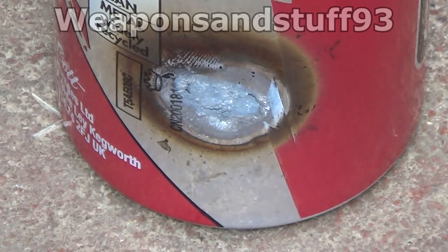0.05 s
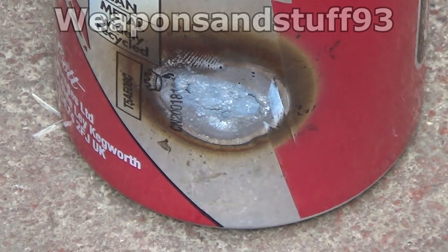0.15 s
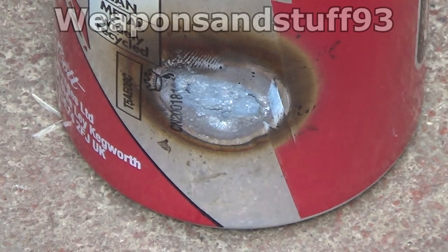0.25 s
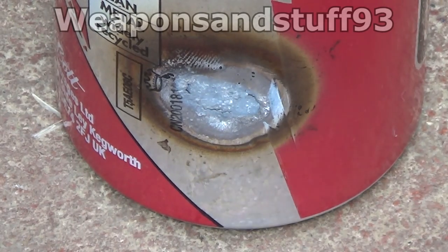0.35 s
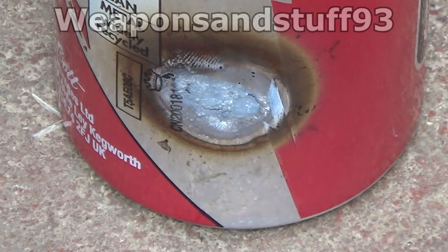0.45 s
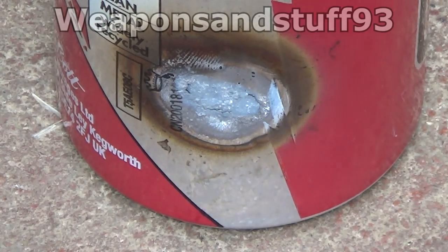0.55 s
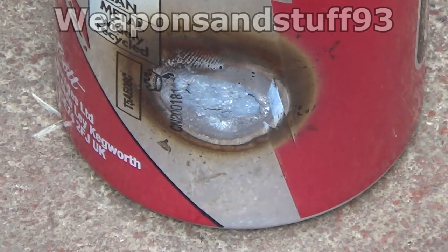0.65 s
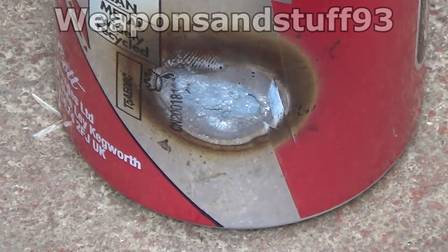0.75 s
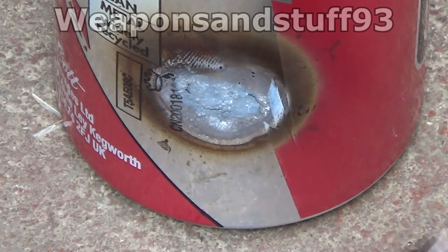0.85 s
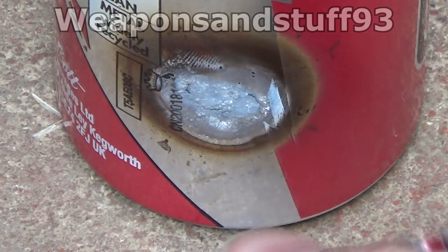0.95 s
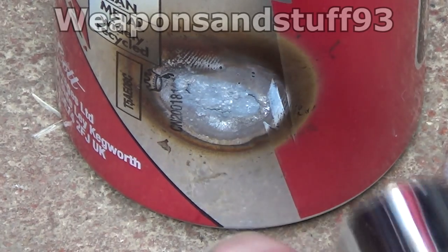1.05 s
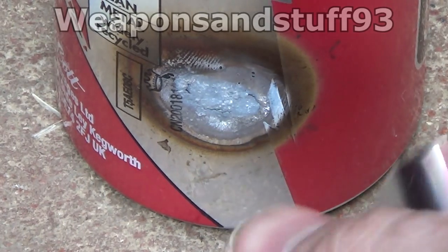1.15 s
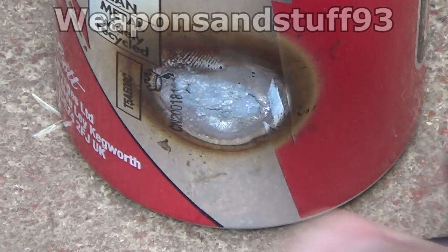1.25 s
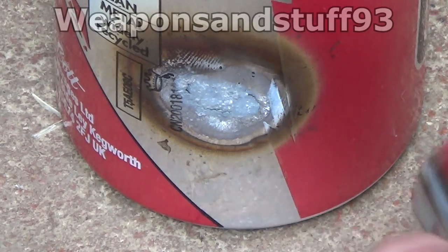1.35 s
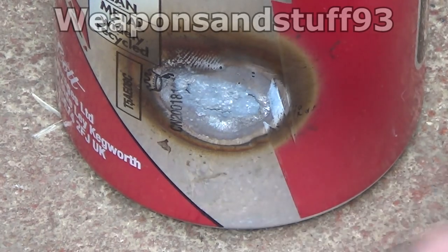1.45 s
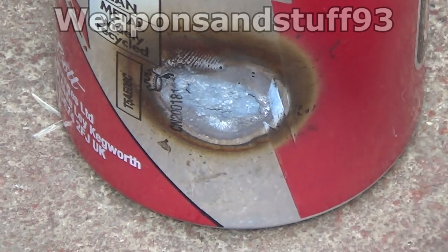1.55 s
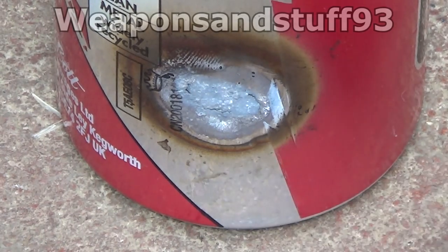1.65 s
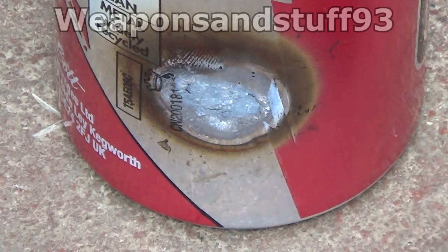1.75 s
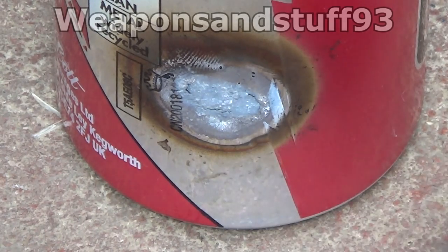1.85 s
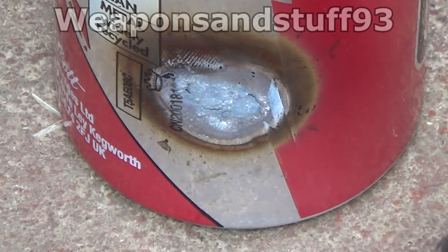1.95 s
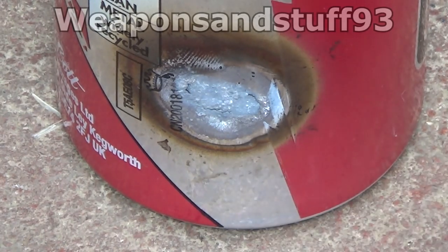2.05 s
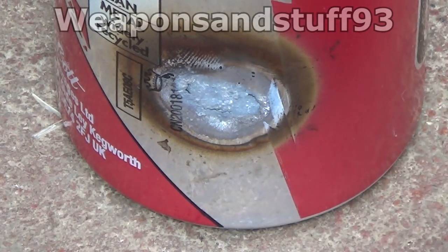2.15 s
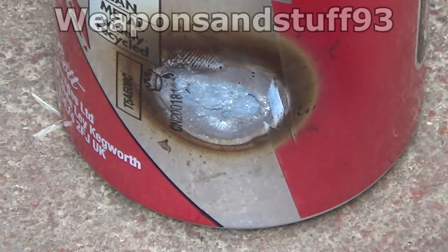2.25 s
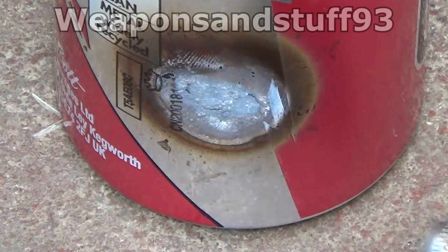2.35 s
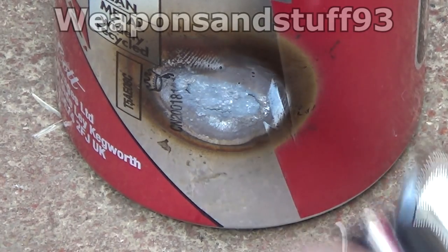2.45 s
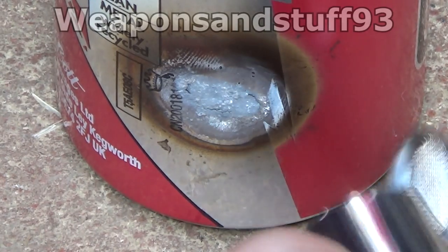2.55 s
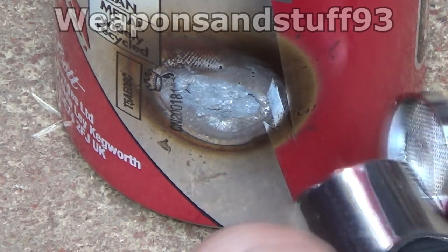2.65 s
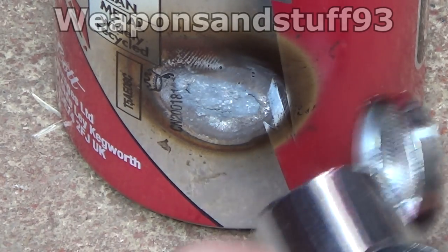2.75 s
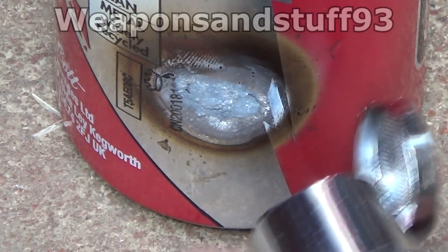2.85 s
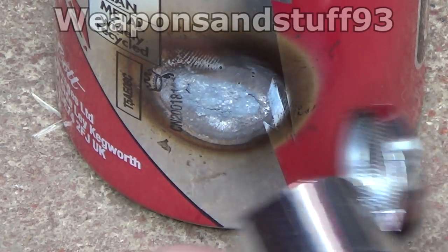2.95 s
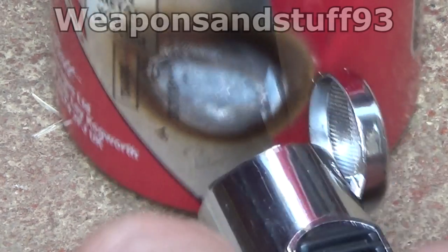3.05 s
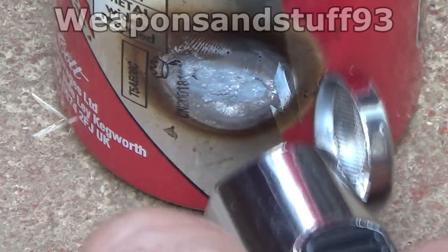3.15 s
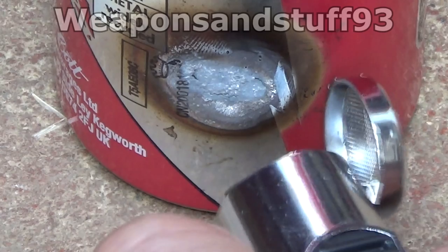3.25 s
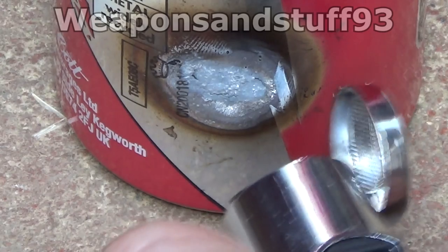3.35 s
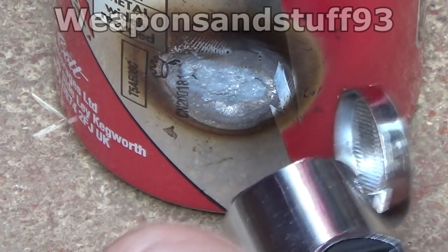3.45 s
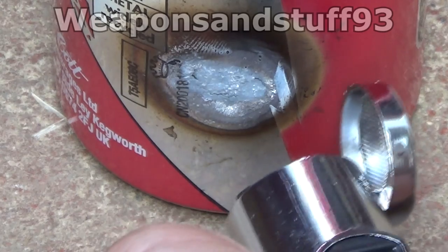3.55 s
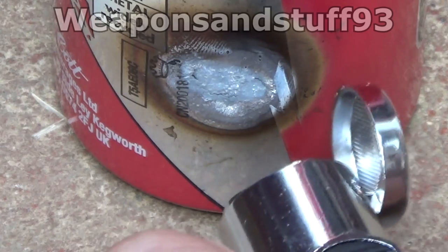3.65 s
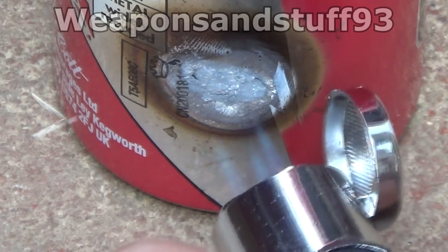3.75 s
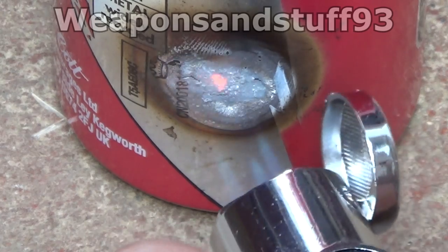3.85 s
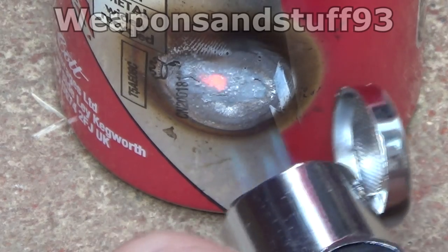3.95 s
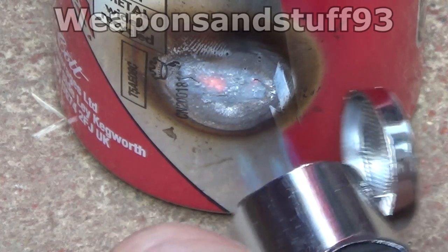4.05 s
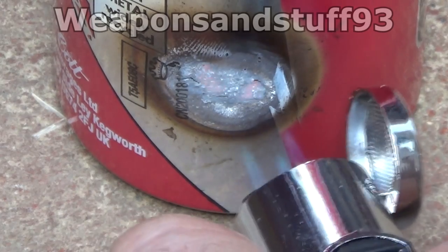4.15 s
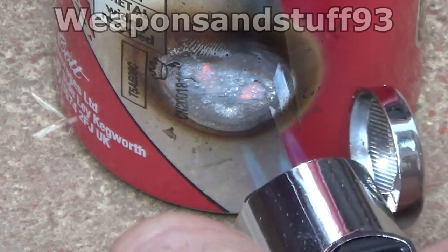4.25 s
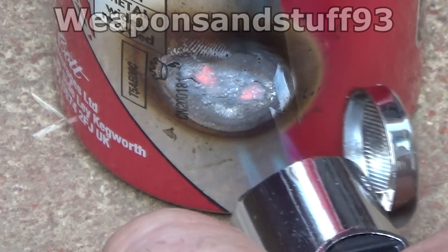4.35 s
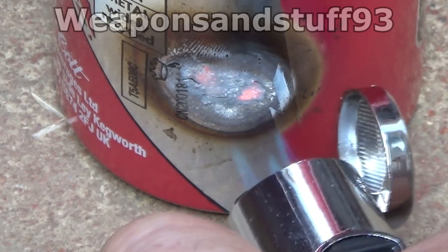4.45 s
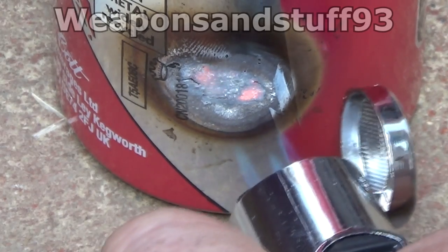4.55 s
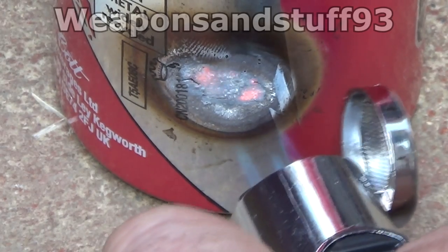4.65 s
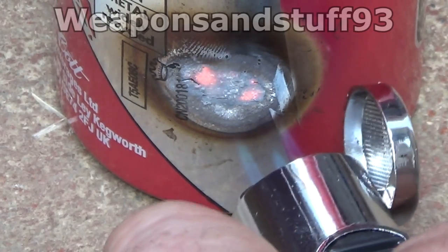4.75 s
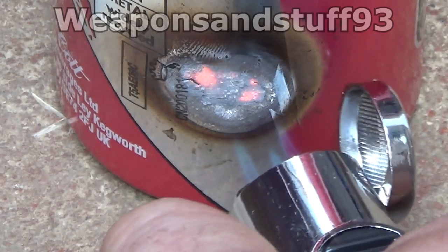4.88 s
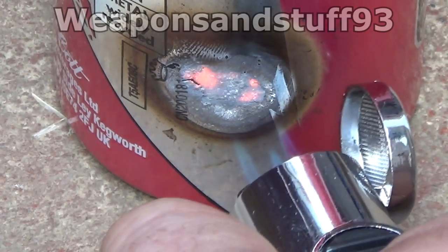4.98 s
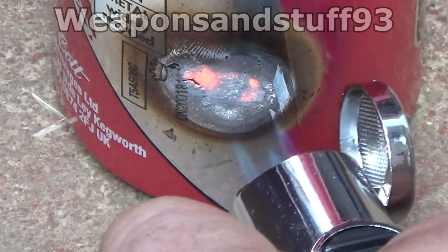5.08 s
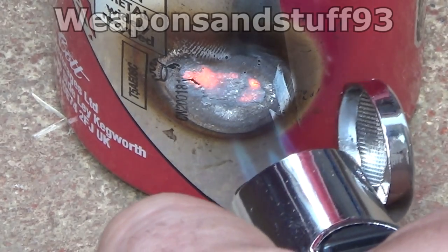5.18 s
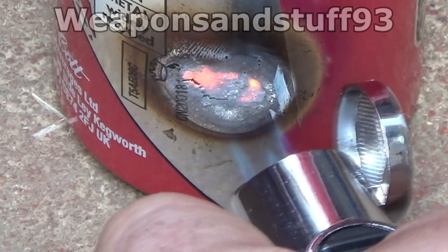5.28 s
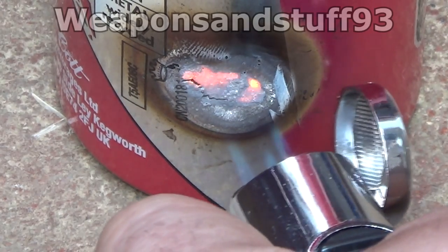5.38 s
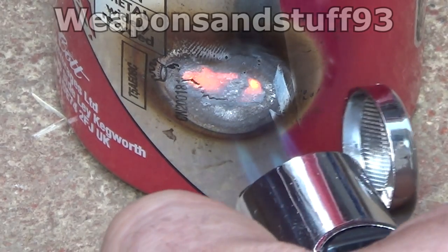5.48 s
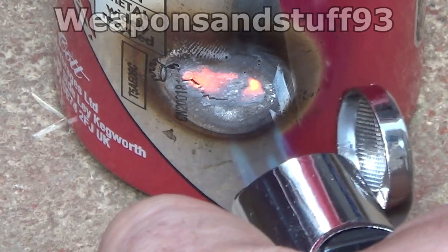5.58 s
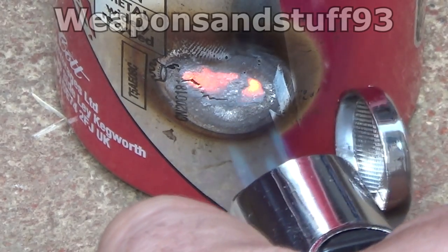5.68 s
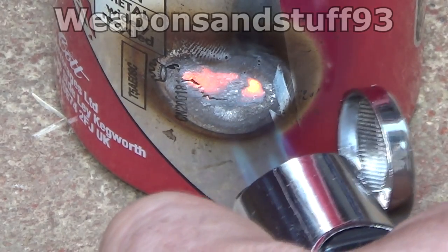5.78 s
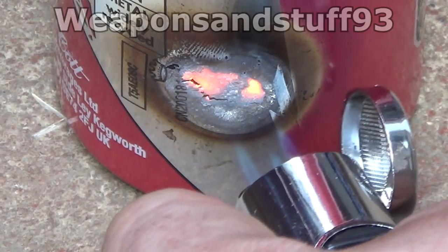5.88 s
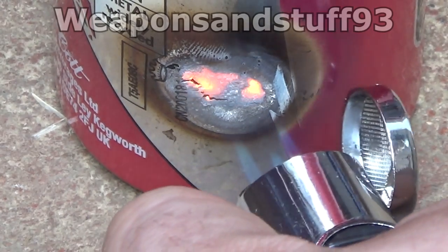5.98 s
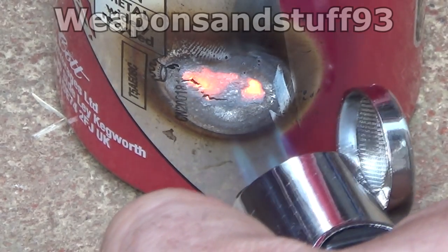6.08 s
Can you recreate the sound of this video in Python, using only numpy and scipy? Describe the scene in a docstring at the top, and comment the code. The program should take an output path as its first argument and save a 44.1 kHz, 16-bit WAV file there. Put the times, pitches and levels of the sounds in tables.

```python
"""Clothes rustle and small metal parts tick, close by and outdoors, as a butane jet lighter is fetched.
The lid clacks open, gas hisses, the igniter snaps and jet flames roar steadily against a can.
Traffic and an engine rumble far off; a small bird chips and a thin whistle wavers faintly.
Rustle, hiss, roar and traffic are coloured noise; ticks, lid and igniter add noise bursts to decaying modes;
engine, bird and whistle are sines of moving pitch or level."""
import sys
import numpy as np
from scipy import signal
from scipy.fft import rfft, irfft
from scipy.io import wavfile
from scipy.ndimage import uniform_filter1d

SR = 44100
rng = np.random.default_rng(int(sys.argv[2]) if len(sys.argv) > 2 else 0)


def store_wav(level_fs):
    """Save 16-bit WAV to argv[1]."""
    pcm = np.round(np.clip(np.atleast_2d(level_fs), -1, 1) * 32767)
    wavfile.write(sys.argv[1], SR, pcm.T.astype(np.int16))


N = 269936
T = np.arange(N) / SR
HZ = np.maximum(np.arange(N // 2 + 1) * SR / N, 1)
TOP_HZ = 15800

# channel difference: freq_hz, gain_db
CHANNEL_DIFFERENCE = [(60, -39), (110, -15.5), (200, -13), (700, -4.5), (1300, -1.5), (2400, 3.5),
                      (4400, 1.5), (9000, -1.5), (11000, -16), (12000, -64)]

# low rumble spectrum: freq_hz, density_db_per_hz
RUMBLE_SPECTRUM = [(15, -28), (28, -6.5), (42, -0.5), (62, 2), (75, -8.5), (110, -10.5), (150, -22.5),
                   (250, -28)]
# far traffic spectrum: freq_hz, density_db_per_hz
AIR_SPECTRUM = [(100, 9), (160, -10.5), (240, 6), (400, 0.5), (650, 1.5), (1000, -4.5), (1600, -11),
                (2600, -13), (4000, -18), (8000, -15.5), (15000, -22.5)]
# far traffic, with a sleeve swell near 2.6 s: time_s, level_db
WASH_LEVEL = [(0, -49.5), (1.3, -56), (1.7, -53), (2.05, -61), (2.6, -52.5), (3.1, -57), (6.1, -50.5)]

# far engine: holds its firing note, then slows
ENGINE_HZ, SLOWED_HZ, SLOWS_FROM_S, SLOWS_TO_S = 60, 50.6, 1.4, 1.59
# engine surges: middle_s, length_s, level_db
ENGINE_SURGES = [(.21, 0.35, -47), (1.05, 0.5, -47), (1.65, .14, -51)]

# whistle pitch: time_s, pitch_hz
WHISTLE_PITCH = [(1.05, 4950), (1.29, 5360), (1.38, 5300), (1.44, 4870), (1.49, 5100), (1.58, 5150),
                 (1.63, 4980), (1.68, 5220), (1.75, 4820), (1.8, 4900)]
# whistle swells: middle_s, length_s, level_db
WHISTLE_LEVEL = [(1.14, .14, -67), (1.35, .15, -65), (1.57, 0.15, -61), (1.72, .09, -63)]
# runs of bird chips: start_s, end_s, spacing_s, last_chip_level_db
CHIP_RUNS = [(0.73, 1.03, .0396, -52.5), (2.169, 2.28, .081, -55), (3.409, 3.56, .11, -56)]

# sleeve spectrum: freq_hz, density_db_per_hz
CLOTH_SPECTRUM = [(88, -40), (150, -9), (239, -6.5), (427, 1), (579, -1), (1120, -5.5), (1420, -4.5),
                  (1870, -5), (2240, -4.5), (3130, -9), (5160, -12.5), (7000, -16.5), (9100, -38),
                  (15400, -120)]
# skin spectrum: freq_hz, density_db_per_hz
SKIN_SPECTRUM = [(2000, -5), (4000, -10), (6500, -5.5), (8000, -0.5), (9700, 0.5), (10600, -3.5),
                 (12300, -5), (13500, -12), (15800, -23)]
# resonances of what the hand rubs: freq_hz, width_hz, gain_db
RUB_RESONANCES = [(2220, 110, 4), (5220, 150, 5)]
# sleeve sweeps: middle_s, length_s, level_db
SLEEVE_SWEEPS = [(.05, 0.69, -45), (.6, 0.24, -45)]
# skin over cloth and metal: middle_s, length_s, level_db
SKIN_RUBS = [(.05, 0.41, -47), (.6, 0.37, -51.5), (1.53, 0.045, -58), (1.84, .08, -63), (2.62, 0.23, -63.5),
             (2.92, 0.29, -59.5)]
# faint rubbing between strokes
SKIN_REST_DB, SLEEVE_REST_DB = -68.5, -63.5

# lighter parts ticking in the hand: start_s, level_db, pitch_hz, treble_db
TICK_EVENTS = [(.640, -24, 1625, -13), (0.8201, -19, 5340, 0), (0.8523, -28, 1400, -16),
               (0.9013, -36.5, 4000, -6), (1.0815, -31.5, 2350, -11), (1.1004, -23, 5600, -6),
               (1.3958, -29.5, 4100, 9), (1.5557, -32, 2960, -14), (1.762, -33, 1790, -6),
               (1.7782, -29.5, 4050, 1.5), (1.7982, -31.5, 4100, -13), (1.958, -40, 3400, -12),
               (2.0132, -36.5, 9820, 5), (2.080, -33.5, 4200, -3), (2.1998, -32, 4060, -1),
               (2.341, -32, 1800, -6), (2.3512, -29, 2400, -6), (2.443, -35, 3550, -11)]
# small-part modes: freq_hz, level_db, t60_s
PART_MODES = [(2494, 0, 0.091), (2575, 0, 0.045), (3400, -10, .03), (4120, -1, 0.094), (5100, -10, 0.024),
              (5330, -10, 0.033), (5500, -16.5, .04), (5950, -1.5, 0.099), (7280, -1.5, 0.048),
              (8900, -25, .04), (9970, 1, 0.063), (11640, 1, 0.019)]

# two lid clacks, each with close echoes: start_s, level_db, treble_db, clatter_t60_s
LID_EVENTS = [(3.1128, -36, 7.5, 0.029), (3.1215, -38.5, -2, 0.17), (3.1352, -36, 0.5, 0.066),
              (3.1435, -42.5, 1, 0.089), (3.1975, -35.5, -18, 0.083), (3.2075, -45, -13, 0.18)]
# lid clatter spectrum: freq_hz, density_db_per_hz
LID_SPECTRUM = [(71, -51), (120, -18), (229, -5), (269, -7), (569, -3), (739, -8), (818, 1), (1440, -13),
                (2200, -8), (3040, -17.5), (8520, -13), (15000, -38)]
# lid and case modes: freq_hz, level_db, t60_s
LID_MODES = [(580, 0, 0.32), (850, -13, .25), (900, -13.5, 1), (1298, -8, 0.7), (1655, -4, 0.45),
             (2150, -4.5, 0.39), (2270, -7, 0.3), (2406, 3.5, 0.22), (2800, -2.5, 0.18), (3400, -6, 0.26),
             (4420, -3, 0.21), (4980, -12, 0.2), (5600, -9, .14), (6140, -7, 0.21)]

# igniter snap and its echoes: start_s, level_db, treble_db, clatter_t60_s
SNAP_EVENTS = [(3.8264, -15, -2.5, 0.023), (3.831, -23.5, 3.5, 0.11), (3.8392, -18, -2.5, 0.087),
               (3.8417, -26, -5, 0.071), (3.8525, -21, 1, 0.074), (3.856, -30, -4, 0.12),
               (3.8615, -19.5, -5.5, 0.16)]
# snap spectrum: freq_hz, density_db_per_hz
SNAP_SPECTRUM = [(100, -25), (250, -7), (600, -33), (1400, -27), (2000, -8), (2500, -1), (3200, -6),
                 (4200, -13), (5400, -3), (6600, -5.5), (8400, 3), (10200, 2), (12500, -14), (14300, -22),
                 (15000, -40)]
# igniter modes: freq_hz, level_db, t60_s
IGNITER_MODES = [(2300, 2, 0.14), (2630, 6, 0.051), (5770, -5, 0.12), (7880, 4, .18), (8520, -1, .22),
                 (8700, 3, 0.22), (9131, -1, .18), (10050, -3, 0.17)]

# unlit gas spectrum: freq_hz, density_db_per_hz
GAS_SPECTRUM = [(1500, -32), (2600, -1), (3100, -9.5), (4700, -4), (5400, 2.5), (7600, 3), (8700, 4.5),
                (10300, 2), (11000, -2), (11400, -6), (13500, -9), (15800, -18)]
# nozzle resonances: freq_hz, width_hz, gain_db
NOZZLE_RESONANCES = [(3520, 280, 16), (4100, 270, 10), (6970, 100, 5), (7650, 200, -5), (8420, 200, 3),
                     (9590, 140, 6)]
# valve opens, then flow creeps up as the trigger is pressed home
VALVE_S, VALVE_OPENING_S, GAS_DB, GAS_RISE_DB_PER_S = 3.15, 0.064, -51.5, 3.5

LIGHT_S, CATCH_S = 3.835, 0.021
# turbulent flame spectrum: freq_hz, density_db_per_hz
FLAME_SPECTRUM = [(170, -21.5), (250, -16.5), (900, -11), (1050, -4.5), (1450, -10.5), (2100, 1),
                  (2750, -6), (3150, -15.5), (5300, -6.5), (7200, -9.5), (9600, -22), (10800, -19.5),
                  (12600, -29.5), (15300, -39.5)]
# peaks and notches from burner, can, nearby surfaces: freq_hz, width_hz, gain_db
FLAME_RESONANCES = [(523, 370, -4.5), (542, 9.5, 14), (738, 25, -20), (950, 27, -7), (1126, 89, 5),
                    (1260, 22, 10.5), (1298, 30, -5), (1436, 27, 6), (1658, 15, 9.5), (1766, 30, 9),
                    (1886, 65, -7.5), (1980, 13, -12.5), (2227, 125, -6), (2427, 25, -25), (2880, 18, 6),
                    (3430, 19, 10.5), (3557, 25, 11), (3830, 36, -18), (3900, 770, 5), (4350, 49, -15),
                    (4710, 40, -10), (5160, 31, -30), (4800, 50, -2), (5670, 21, -26), (7770, 75, -8)]
# level at ignition, and rise as the jets are brought up to the can
BURN_DB, CLOSER_DB, CLOSER_FROM_S, CLOSER_TO_S = -39.5, 3, 4.36, 5.15
# hiss against roar, and its drop as the lighter is tilted
HISS_DB, TILT_DB, TILT_FROM_S, TILT_TO_S = -0.5, -2.1, 5.76, 6


def undb(db):
    """Decibels to gain."""
    return 10 ** (np.asarray(db) / 20)


def unit(x):
    """Scale to an rms of 1."""
    return x / np.sqrt(np.mean(x ** 2))


def curve(rows, axis=1):
    """One table column, joined by straight lines in time."""
    rows = np.array(rows)
    return np.interp(T, rows[:, 0], rows[:, axis])


def ramp(from_s, to_s):
    """Rise from 0 to 1 between two times."""
    return np.clip((T - from_s) / max(to_s - from_s, 1 / SR), 0, 1)


def swells(rows, rest_db=-np.inf):
    """Gain of bell-shaped swells over a resting level; powers add."""
    power = sum(undb(db) ** 2 * np.exp(-(2 * (T - s) / length_s) ** 2) for s, length_s, db in rows)
    return np.sqrt(power + undb(rest_db) ** 2)


def shape(points, peaks=()):
    """Gain over frequency: broad spectrum rolled off at both ends, plus narrow peaks and notches."""
    hz, db = np.transpose(points)
    db = np.interp(np.log(HZ), np.log(hz), db)
    for centre_hz, width_hz, peak_db in peaks:
        db = db + peak_db / (1 + (2 * (HZ - centre_hz) / width_hz) ** 2)
    low_end = np.minimum(HZ / hz[0], 1) ** 2
    high_end = np.minimum(hz[-1] / HZ, 1) ** 2
    return undb(db) * low_end * high_end


def noise(gain, side):
    """Coloured stereo noise, rms 1; channels differ least in the bass and the highest treble."""
    mid, diff = rfft(rng.standard_normal((2, N)))
    diff = diff * side * shape(CHANNEL_DIFFERENCE)
    return unit(irfft(gain * np.array([mid + diff, mid - diff]), N))


def walk(rate_hz):
    """Smooth random wandering, rms near 1."""
    k = int(SR / rate_hz)
    steps = np.repeat(rng.standard_normal(N // k + 1), k)
    smooth = uniform_filter1d(uniform_filter1d(steps, k), k)
    return unit(smooth[:N])


def pan(x, db):
    """Make left louder than right by db."""
    return x * undb(np.array([[db], [-db]]) / 2)


def fade(t, t60_s):
    """Exponential decay, 60 dB in t60_s."""
    return np.exp(-np.log(1000) * t / max(t60_s, np.finfo(float).eps))


def shelf(x, db, corner_hz):
    """Raise or lower everything above a corner frequency."""
    low = signal.sosfilt(signal.butter(1, corner_hz, fs=SR, output="sos"), x)
    return low + undb(db) * (x - low)


def add(out, start_s, x):
    """Mix in a short sound at start_s."""
    i = int(start_s * SR)
    out[:, i:i + x.shape[1]] += x[:, :N - i]


def ring(modes, t, spread_rad, rough=0.64, rough_hz=260):
    """Struck modes of loosely joined metal: level and phase waver roughly; channel phases differ."""
    out = 0
    for hz, db, t60_s in modes:
        chance = rng.standard_normal((2, len(t) // 16)).repeat(17, axis=1)[:, :len(t)]
        swell, drift = unit(uniform_filter1d(chance, max(int(SR / rough_hz), 1)))
        phase = 2 * np.pi * (hz * t + rng.random()) + rough * drift
        phase = phase + spread_rad * rng.standard_normal((2, 1))
        out = out + undb(db) * fade(t, t60_s) * (1 + rough * swell) * np.sin(phase)
    return out


def treble_ripple(depth_db, t60_s=0.074, from_hz=4500, count=2048):
    """Random fine ripple in the treble, bounded in dB: the spectrum of a decaying noise tail."""
    t = np.arange(count) / SR
    tail = rng.standard_normal(count) * fade(t, t60_s) * (t > .002)
    ripple = np.tanh(unit(rfft(tail, N).real))
    treble_share = HZ ** 4 / (HZ ** 4 + from_hz ** 4)
    return undb(depth_db * ripple * treble_share)


def outdoors(rumble_db=-52.5, gust_db=0.1, waver_db=0.67):
    """Low gusty rumble, nearly equal in both channels, and a wash of far traffic with a sleeve swell."""
    rumble = noise(shape(RUMBLE_SPECTRUM), side=0.039) * undb(rumble_db + gust_db * walk(9.9))
    wash = noise(shape(AIR_SPECTRUM), side=0.71) * undb(curve(WASH_LEVEL) + waver_db * walk(5.45))
    return rumble + wash


def drone(rough=0.092):
    """Firing note of a distant engine: only its bass arrives, as one surging sine."""
    hz = ENGINE_HZ + (SLOWED_HZ - ENGINE_HZ) * ramp(SLOWS_FROM_S, SLOWS_TO_S)
    tone = np.sqrt(2) * np.sin(2 * np.pi * np.cumsum(hz) / SR)  # rms 1
    return tone * (1 + rough * walk(30.2)) * swells(ENGINE_SURGES)


def whistle(waver_hz=35, flicker_db=2):
    """Faint high whistle: a sine of wavering pitch and level that comes and goes."""
    hz = curve(WHISTLE_PITCH) + waver_hz * walk(350)
    tone = np.sin(2 * np.pi * np.cumsum(hz) / SR)
    return tone * swells(WHISTLE_LEVEL) * undb(flicker_db * walk(34.3))


def bird(start_hz=2700, end_hz=3050, length_s=0.009, growth_db_per_s=22):
    """Far-off short rising chips, evenly spaced and growing louder through each run."""
    out, u = np.zeros((2, N)), np.linspace(0, 1, int(length_s * SR))
    hz = start_hz + (end_hz - start_hz) * u
    chip = np.sin(np.pi * u) * np.sin(2 * np.pi * np.cumsum(hz) / SR)
    for start_s, end_s, spacing_s, db in CHIP_RUNS:
        times_s = np.arange(start_s, end_s, spacing_s)
        for s in times_s:
            add(out, s, undb(db + growth_db_per_s * (s - times_s[-1])) * chip[None])
    return out


def handling(ripple, grain_db=1.1, catch_db=0.9, end_s=3.7):
    """Cloth and skin slide in tiny catches and slips: noise with fast and slower level wander."""
    grip = undb(grain_db * walk(500) + catch_db * walk(45.8))
    sleeve = noise(shape(CLOTH_SPECTRUM, RUB_RESONANCES), side=0.33)
    sleeve = pan(sleeve, db=-4.5) * swells(SLEEVE_SWEEPS, SLEEVE_REST_DB)
    skin = noise(shape(SKIN_SPECTRUM, RUB_RESONANCES) * ripple, side=0.4)
    skin = skin * swells(SKIN_RUBS, SKIN_REST_DB)
    return grip * (sleeve + skin) * (T < end_s)


def fidget(per_s=30, level_db=-56.5, spread_db=7.5, t60_s=0.029, start_s=.85, end_s=2.5, count=2048):
    """Fingers shifting grip: many tiny dull contacts at random times, each a decaying noise burst."""
    hits = (rng.random(N) < per_s / SR) * (T > start_s) * (T < end_s)
    sizes = undb(spread_db * np.tanh(rng.standard_normal(N)))
    envelope = signal.fftconvolve(hits * sizes, fade(np.arange(count) / SR, t60_s))[:N]
    colour = shape([(900, 5.5), (1700, 7), (3000, 5), (5000, -2), (10000, -14)])
    return undb(level_db) * envelope * noise(colour, side=0.2)


def ticks(crack_t60_s=0.017, tail_db=-17, tail_t60_s=0.19, ring_db=-15,
          focus_db=11, focus_per_db=0.13, focus_octaves=0.16, count=8192):
    """Each contact cracks, rings the parts and scatters off the surroundings; its place favours one pitch."""
    out, t = np.zeros((2, N)), np.arange(count) / SR
    hz = np.maximum(np.arange(count + 1) * SR / count / 2, 1)
    colour = shape([(1300, 0.5), (2400, 1.5), (6000, 2), (11000, -0.5), (15000, -22)])
    direct, scattered = noise(colour, side=0.3), noise(colour, side=0.25)
    typical_db = np.median(np.array(TICK_EVENTS)[:, 1])
    for k, (start_s, db, pitch_hz, treble_db) in enumerate(TICK_EVENTS):
        part = slice(k * count, (k + 1) * count)
        crack = direct[:, part] * fade(t, crack_t60_s)
        tail = undb(tail_db) * scattered[:, part] * fade(t, tail_t60_s)
        tick = crack + tail + undb(ring_db) * ring(PART_MODES, t, spread_rad=0.27)
        # firmer contacts, metal on metal, stand out more at their own pitch
        contrast_db = focus_db + focus_per_db * (db - typical_db)
        bell = np.exp(-(np.log2(hz / pitch_hz) / focus_octaves) ** 2)
        focus = undb(contrast_db * (bell - 1))
        tick = irfft(rfft(tick, 2 * count) * focus)[:, :count]
        add(out, start_s, undb(db) * shelf(tick, treble_db, corner_hz=4970))
    return out


def clack(events, spectrum, modes, ring_db, side, corner_hz, contact_s=0.00035, count=24000):
    """Run of blows and echoes: each a dense short clatter plus ringing metal, with a brief linear onset."""
    out, t = np.zeros((2, N)), np.arange(count) / SR
    clatter, push = noise(shape(spectrum), side), np.minimum(t / contact_s, 1)
    for k, (start_s, db, treble_db, t60_s) in enumerate(events):
        burst = clatter[:, k * count:(k + 1) * count] * fade(t, t60_s)
        blow = burst + undb(ring_db) * ring(modes, t, spread_rad=side)
        add(out, start_s, undb(db) * shelf(push * blow, treble_db, corner_hz))
    return out


def lid():
    """Lid clacks twice as it opens, each with close echoes; lid and case ring."""
    return clack(LID_EVENTS, LID_SPECTRUM, LID_MODES, ring_db=-10, side=0.34, corner_hz=2500)


def igniter():
    """Igniter snaps once, loudly; echoes and ringing metal follow."""
    return clack(SNAP_EVENTS, SNAP_SPECTRUM, IGNITER_MODES, ring_db=-19.5, side=0.36, corner_hz=5000)


def gas(ripple):
    """Cold butane hisses evenly through resonant nozzles until it lights."""
    flow = ramp(VALVE_S, VALVE_S + VALVE_OPENING_S) * (1 - ramp(LIGHT_S, LIGHT_S + CATCH_S))
    level = undb(GAS_DB + GAS_RISE_DB_PER_S * (T - VALVE_S))
    return noise(shape(GAS_SPECTRUM, NOZZLE_RESONANCES) * ripple, side=0.3) * flow * level


def flame(ripple, flap_db=-19, roar_db=.5, flutter_db=0.5, split_hz=3200):
    """Turbulent burning roars in the burner's resonances, fast jets hiss above; all flutter together."""
    colour = shape(FLAME_SPECTRUM, FLAME_RESONANCES) * ripple
    flap = undb(flap_db) * noise(shape([(65, 8.5), (105, -1), (150, -18.0), (200, -33)]), side=0.21)
    low_share = 1 / (1 + (HZ / split_hz) ** 8)  # of power
    roar = undb(roar_db) * noise(colour * np.sqrt(low_share), side=0.28)
    hiss = noise(colour * np.sqrt(1 - low_share), side=0.29)
    hiss = hiss * undb(HISS_DB + TILT_DB * ramp(TILT_FROM_S, TILT_TO_S))
    burn = undb(BURN_DB + CLOSER_DB * ramp(CLOSER_FROM_S, CLOSER_TO_S) + flutter_db * walk(30))
    lit = ramp(LIGHT_S, LIGHT_S + CATCH_S)
    return (flap + pan(roar, db=0.6) + pan(hiss, db=0.1)) * lit * burn


def scene():
    """Outdoor background, handling, then the lighter from ticks to flame."""
    ripple = treble_ripple(depth_db=3.9)
    background = outdoors() + drone() + whistle() + bird()
    hand = handling(np.sqrt(ripple)) + fidget()  # square root: half the ripple in dB
    lighter = ticks() + pan(lid(), db=0.5) + igniter() + gas(ripple) + flame(ripple)
    return background + hand + lighter


def record(dry):
    """Steep low-pass at TOP_HZ."""
    return signal.sosfilt(signal.ellip(10, .1, 80, TOP_HZ, fs=SR, output="sos"), dry)


dry = scene()
out = record(dry)
store_wav(out)
```